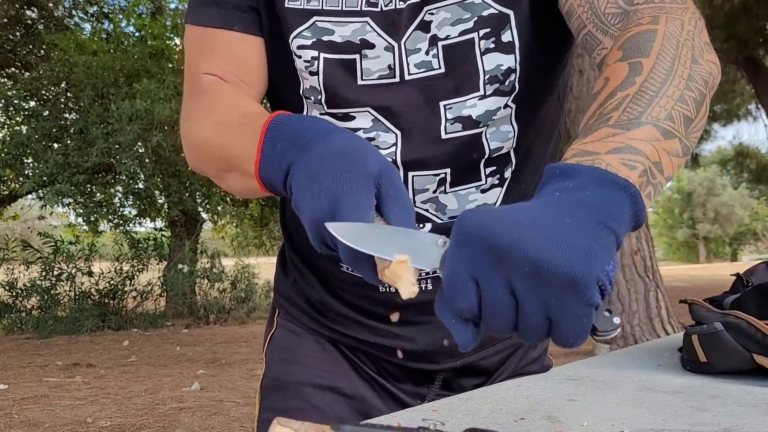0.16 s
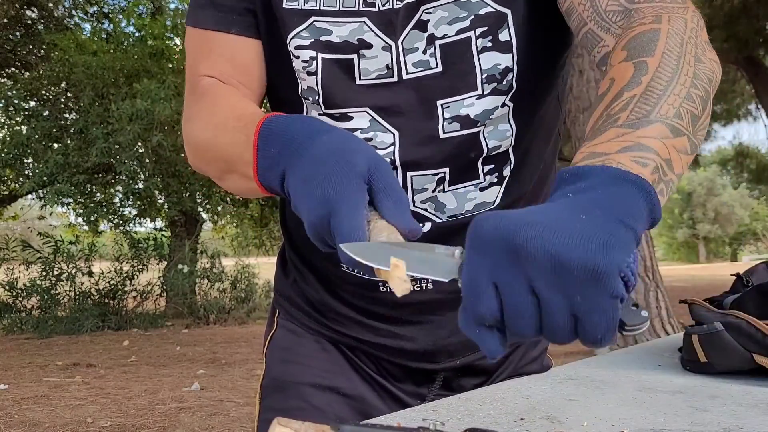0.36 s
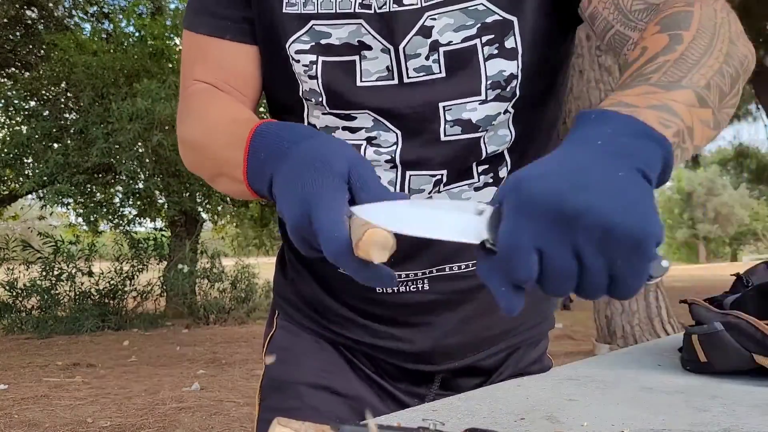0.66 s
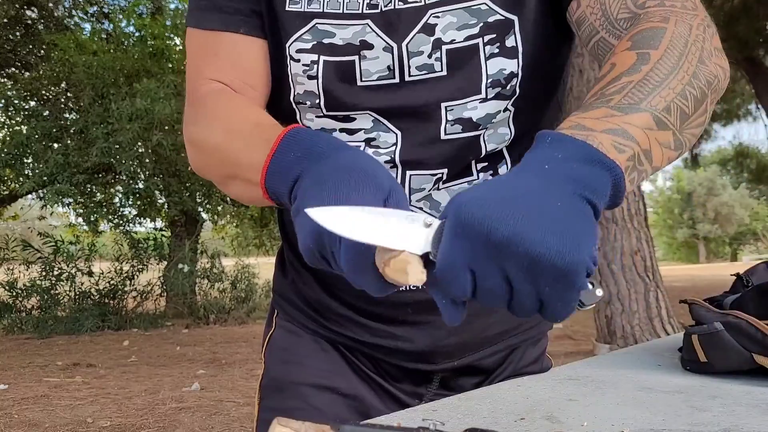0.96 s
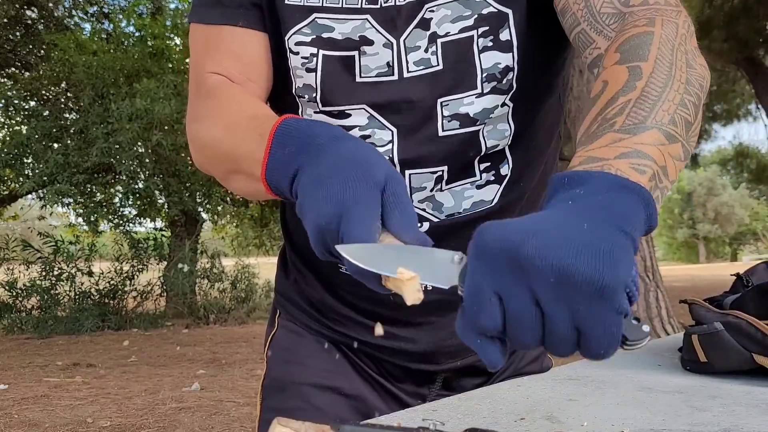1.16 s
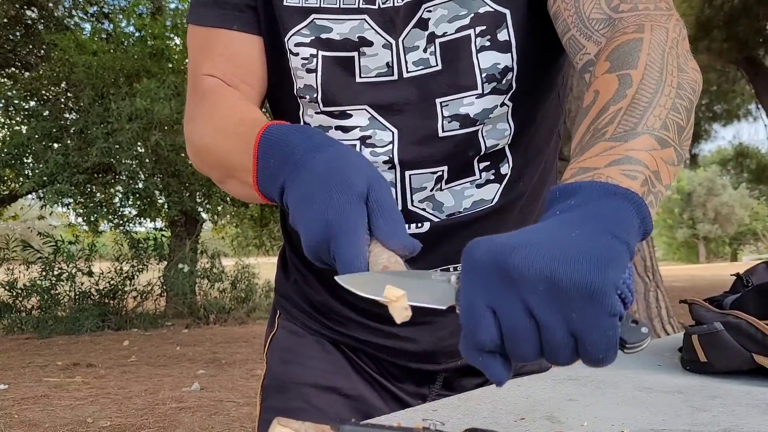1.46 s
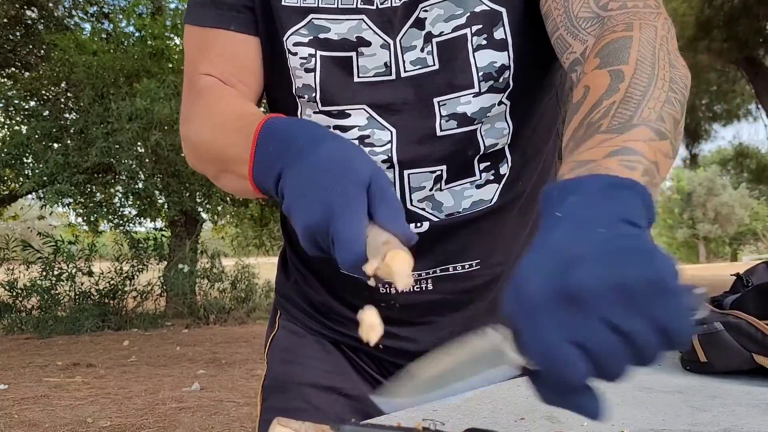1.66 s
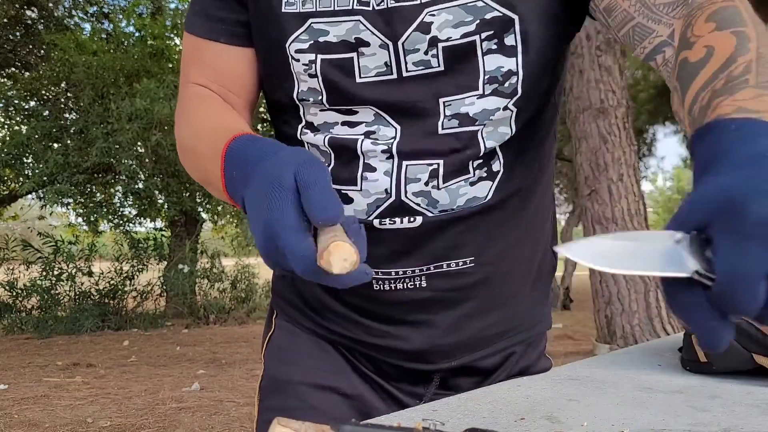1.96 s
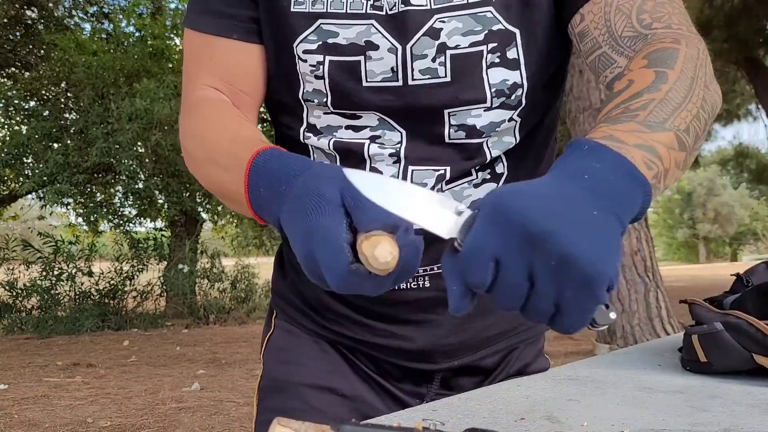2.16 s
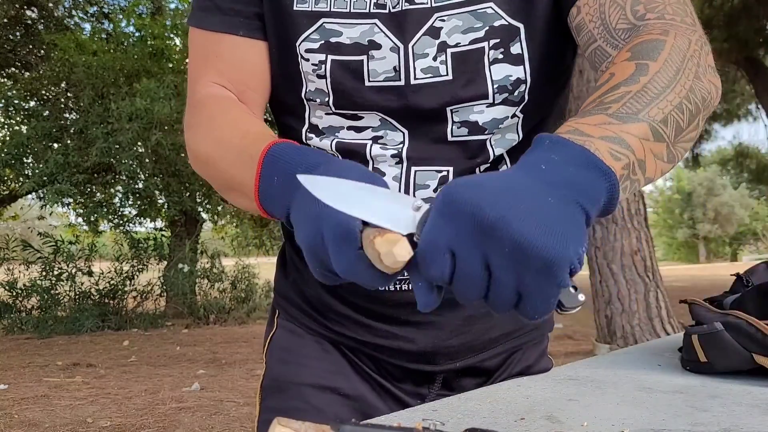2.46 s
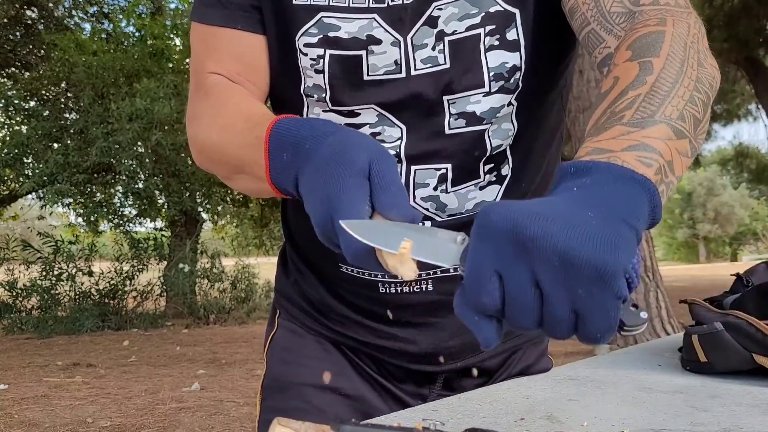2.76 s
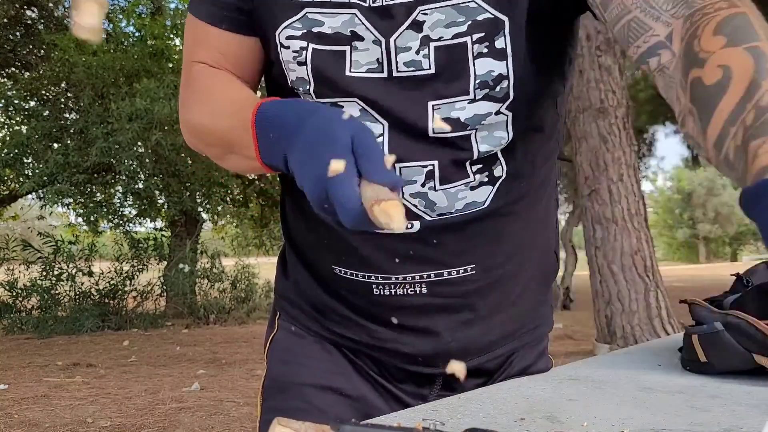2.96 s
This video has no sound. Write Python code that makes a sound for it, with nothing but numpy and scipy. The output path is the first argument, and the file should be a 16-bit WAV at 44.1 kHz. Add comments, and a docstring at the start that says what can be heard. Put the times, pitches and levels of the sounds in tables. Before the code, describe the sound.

Close outdoor whittling: quick crunchy cuts, a pause with a blade knock, more sharp strokes, quiet handling, then the brightest final snaps and a tick, over wavering low engine hum and fading breeze.

```python
"""An engine hums far off from the start, with a brief second hum: swelling sines over noise of the open air.
A knife whittles a hand-held stick close by: bursts of tiny impulses tear fibres and ring the damped stick.
Between strokes chips tick (noise snaps), gloves rustle (grainy friction), the blade knocks as it is set down
(decaying modes) and its edge slides (a thin hiss). More strokes follow while the breeze dies; a tick comes last."""
import sys
import numpy as np
from scipy import signal
from scipy.fft import rfft, irfft, next_fast_len
from scipy.io import wavfile
from scipy.ndimage import map_coordinates

SR = 44100
rng = np.random.default_rng(int(sys.argv[2]) if len(sys.argv) > 2 else 0)


def persist_wave(psi):
    """Save psi, clipped to +-1, as 16-bit WAV."""
    counts = np.round(np.clip(psi, -1, 1) * 32767).astype(np.int16)
    wavfile.write(sys.argv[1], SR, np.atleast_2d(counts).T)


N = 136710


def amp(db):
    """Decibels to amplitude ratio."""
    return 10 ** (np.asarray(db) / 20)


def unit(x):
    """Scale to rms 1."""
    return x / np.sqrt(np.mean(x ** 2) + 1e-20)


def along(points, hz):
    """Interpolate (hz, value) points on a log frequency axis."""
    point_hz, value = np.transpose(points)
    return np.interp(np.log(hz + 1), np.log(point_hz + 1), value)


def curve(points):
    """Interpolate (time_s, value) points to one value per sample."""
    return np.interp(np.arange(N) / SR, *np.transpose(points))


def filtered(x, response):
    """Multiply the spectrum by a response of frequency."""
    n = x.shape[-1]
    padded_n = next_fast_len(n + 4096)
    spectrum = rfft(x, padded_n) * response(np.fft.rfftfreq(padded_n, 1 / SR))
    return irfft(spectrum, padded_n)[..., :n]


def colour(points):
    """Response through (hz, db) points."""
    return lambda hz: amp(along(points, hz))


def resonances(modes, pitch_ratio):
    """Sum of band resonances of alternating sign, centres transposed by a pitch ratio."""
    def response(hz):
        total = 0
        for k, (centre_hz, width_hz, level_db) in enumerate(modes):
            damping = 1j * hz * width_hz
            stiffness = (centre_hz * pitch_ratio) ** 2
            total = total + (-1) ** k * amp(level_db) * damping / (stiffness - hz * hz + damping)
        return total
    return response


def pan(left_right_db):
    """Left and right gains of constant total power."""
    return unit(amp([[left_right_db / 2], [-left_right_db / 2]]))


def spread(pair, alike):
    """Mix two unrelated signals to a given left-right likeness."""
    turn = np.arccos(np.clip(alike, -1, 1)) / 2
    mid = np.cos(turn) * pair[0]
    side = np.sin(turn) * pair[1]
    return np.array([mid + side, mid - side])


def cracks(n, per_s, spread_db):
    """Two rows of tiny impulses at shared random moments, a few much larger than the rest."""
    size = amp(spread_db * np.minimum(rng.exponential(size=n), 3))
    happens = rng.random(n) < per_s / SR
    return rng.standard_normal((2, n)) * size * happens


def wobble(turns_per_s):
    """Smooth random curve through so many random points a second."""
    points = rng.standard_normal(int(N * turns_per_s / SR) + 4)
    return map_coordinates(points, [np.arange(N) * turns_per_s / SR])


def add(track, start_s, sound):
    """Mix a sound into the track."""
    i = max(round(start_s * SR), 0)
    track[:, i:i + sound.shape[1]] += sound[:, :N - i]


# engine fundamental: (time_s, pitch_hz)
ENGINE_PITCH = [(0, 121.9), (1.5, 120), (3.1, 119)]
# rms levels of fundamental and second harmonic: (time_s, level_db)
ENGINE_LEVEL = [(0, -38.5), (.35, -36), (.62, -28.5), (.85, -36), (1.05, -42), (1.25, -27), (1.5, -29.5),
                (1.9, -34.5), (2.5, -34), (2.7, -60), (2.83, -33), (3.1, -59)]
OCTAVE_LEVEL = [(0, -58.5), (.5, -47.5), (1.3, -49.5), (1.7, -48), (3.1, -49)]
FLUTTER_DB, FLUTTER_TURNS_PER_S = 1.3, 30
DRONE_HZ, DRONE_DB, DRONE_END_S, DRONE_FADE_S = 219.5, -47, 0.82, 0.11


def engine():
    """A far engine sinks in pitch as two harmonics swell and fade, the lower fluttering; a second hum fades."""
    t = np.arange(N) / SR
    phase = 2 * np.pi * np.cumsum(curve(ENGINE_PITCH)) / SR
    flutter_db = FLUTTER_DB * wobble(FLUTTER_TURNS_PER_S)
    hum = amp(curve(ENGINE_LEVEL) + flutter_db) * np.sin(phase)
    octave = amp(curve(OCTAVE_LEVEL)) * np.sin(2 * phase)
    drone_fade = np.clip((DRONE_END_S - t) / DRONE_FADE_S, 0, 1)
    drone = amp(DRONE_DB) * drone_fade * np.sin(2 * np.pi * DRONE_HZ * t)
    return np.sqrt(2) * (hum + octave + drone)  # rms to peak


# left-right likeness of the open air: (freq_hz, likeness_0_to_1)
AIR_ALIKE = [(30, 0.2), (60, 0.64), (130, 0.69), (500, 0.52), (1200, 0.06), (10000, 0.026)]


def wash(points):
    """Stereo noise of rms 1 with the given spectrum."""
    hz = np.fft.rfftfreq(N, 1 / SR)
    noise = spread(rfft(rng.standard_normal((2, N))), along(AIR_ALIKE, hz))
    return unit(irfft(noise * amp(along(points, hz)), N))


# spectra of low rumble, distant wash and hissing leaves: (freq_hz, relative_db)
RUMBLE_COLOUR = [(22, -31), (40, 1), (60, 10), (80, 6.5), (105, -2), (138, 6), (185, -9), (260, -10.5),
                 (380, -44), (1500, -110)]
AIR_COLOUR = [(150, -10.5), (300, 2), (500, -7), (1200, -4.5), (1700, -13.5), (2300, -16.5), (3000, -30.5),
              (6500, -39.5), (9000, -45)]
BREEZE_COLOUR = [(1200, -33), (2800, 7), (4200, 1), (6000, -8), (15000, -18)  ]
RUMBLE_DB, RUMBLE_SWELL_DB, RUMBLE_TURNS_PER_S = -33.5, 1, 17
AIR_DB, BREEZE_START_DB, BREEZE_FADE_DB_PER_S = -47.5, -63, 10.5


def air():
    """Uneven low rumble, a soft distant wash, and leaves hissing as a breeze dies away."""
    rumble_db = RUMBLE_DB + RUMBLE_SWELL_DB * wobble(RUMBLE_TURNS_PER_S)
    rumble = amp(rumble_db) * wash(RUMBLE_COLOUR)
    breeze_db = BREEZE_START_DB - BREEZE_FADE_DB_PER_S * np.arange(N) / SR
    breeze = amp(breeze_db) * wash(BREEZE_COLOUR)
    return pan(3.14) * (rumble + amp(AIR_DB) * wash(AIR_COLOUR) + breeze)


# fibres tearing; levels before the layer gains:
# (peak_s, width_s, thud_db, ring_db, splinter_db)
TEARS = [(0.074, 0.0018, -39.5, -43, -46), (0.099, 0.0093, -46.5, -39, -49.5),
         (0.116, 0.0098, -40.5, -39, -43), (0.197, 0.0068, -32.5, -26.5, -31),
         (0.201, 0.002, -29, -29, -24.5), (0.213, 0.0051, -47, -39, -39), (0.223, 0.0039, -38, -37.5, -34),
         (0.391, 0.0098, -39, -38.5, -35), (0.4, 0.0033, -36, -40, -24.5), (0.408, 0.012, -39.5, -37, -30),
         (1.054, 0.0041, -36, -37, -41), (1.073, 0.0033, -36, -22.5, -25.5),
         (1.111, 0.0065, -34, -31, -33.5), (1.134, 0.0094, -38.5, -40.5, -35),
         (1.239, 0.0054, -35.5, -34, -35), (1.657, 0.0054, -32.5, -36.5, -23),
         (1.664, 0.012, -61, -36, -36), (2.549, 0.02, -55, -48.5, -54), (2.635, 0.0038, -47, -34.5, -51),
         (2.662, 0.0086, -31.5, -23.5, -31.5), (2.671, 0.003, -50, -30.5, -32.5),
         (2.697, 0.004, -51, -48, -40), (2.706, 0.0035, -52, -46, -39), (2.8586, 0.0025, -32, -28, -19.5),
         (2.864, 0.0042, -28.5, -27, -31), (2.883, 0.0045, -36.5, -24, -17.5)]
# pitch shifts with grip and blade place; bite is relative to the splinter column:
# (from_s, thud_pitch_ratio, ring_pitch_ratio, bite_db)
GRIPS = [(0, 1.1, 1.01, -8), (.35, 1.04, .99, -10), (1, 1.04, 1.03, -11), (1.2, .96, .89, -16),
         (1.6, .86, 1.04, -10), (2.5, 1, .91, -12), (2.8, .93, .94, -14), (2.875, .97, 1.01, -7.5)]
# hand-damped stick, thud and ring, before the pitch ratios: (centre_hz, width_hz, relative_db)
THUD_MODES = [(429, 178, -3.5), (592, 143, 3), (766, 160, -5)]
RING_MODES = [(1192, 154, 4), (1822, 270, 0.5), (2400, 230, 0), (3100, 184, -1), (3780, 430, -6)]
# dry fibres snapping, before the pitch ratio: (centre_hz, width_hz, relative_db)
BITE_MODES = [(3020, 330, 4), (4890, 840, -1)]
# splinter treble: (freq_hz, relative_db)
SPLINTER_COLOUR = [(2500, 1), (4200, -4.5), (4800, -13), (5500, -11), (6500, 4), (8500, -1), (12000, 6),
                   (15500, 2)]
# where the cuts are heard: (freq_hz, left_right_db)
CUT_LEAN = [(500, -1.5), (1300, 4.5), (2400, 2.5), (3300, 3), (4700, -2), (6300, -4), (8200, 7.5),
            (11000, 5), (14000, 1)]
CRACKS_PER_S, CRACK_SPREAD_DB = 7500, 3.5
RISE, FALL = 0.43, 0.51  # shares of the width
SWELL_ROUNDNESS = 1.07  # 1 = pointed burst, 2 = bell
THUD_GAIN_DB, RING_GAIN_DB, SPLINTER_GAIN_DB = 1.5, -1, -3


def cuts():
    """Bursts of cracks swell and die within milliseconds: they thud, ring the stick, bite and spit treble."""
    out = np.zeros((2, N))
    t = np.arange(-SR // 32, SR // 16) / SR
    for peak_s, width_s, thud_db, ring_db, splinter_db in TEARS:
        _, thud_pitch, ring_pitch, bite_db = [row for row in GRIPS if row[0] <= peak_s][-1]
        side_share = np.where(t < 0, RISE, FALL)
        swell = np.exp(-np.abs(t / side_share / width_s) ** SWELL_ROUNDNESS)
        layers = [  # response, level_db, left-right likeness
            (resonances(THUD_MODES, thud_pitch), thud_db + THUD_GAIN_DB, .93),
            (resonances(RING_MODES, ring_pitch), ring_db + RING_GAIN_DB, .7),
            (resonances(BITE_MODES, 0.99), splinter_db + bite_db, 0),
            (colour(SPLINTER_COLOUR), splinter_db + SPLINTER_GAIN_DB, -.15)]
        width_gain = np.sqrt(width_s * SR / len(t))  # wider bursts carry more energy
        for response, level_db, alike in layers:
            grains = spread(cracks(len(t), CRACKS_PER_S, CRACK_SPREAD_DB), alike)
            burst = unit(filtered(grains * swell, response))
            add(out, peak_s + t[0], amp(level_db) * burst * width_gain)
    return filtered(out, lambda hz: amp(np.outer([.5, -.5], along(CUT_LEAN, hz))))


# echo among the trees: (freq_hz, t60_s)
TREE_DECAY = [(300, .9), (3000, 0.73), (8000, 0.49)]
TREES_DB, NEAR_DB, NEAR_T60_S = -23.5, -13.5, 0.017


def echoes(x):
    """Quick reflections off body and table, and a faint long tail from the trees, as decaying noise."""
    hz, t, cells = signal.stft(rng.standard_normal((2, SR)), SR, nperseg=256)
    decay = amp(-60 * t / along(TREE_DECAY, hz)[:, None])
    far = signal.istft(cells * decay, SR, nperseg=256)[1][:, :SR]
    t = np.arange(SR) / SR
    near = rng.standard_normal((2, SR)) * amp(-60 * t / NEAR_T60_S) * (t > .002)
    tail = amp(TREES_DB) * unit(far) + amp(NEAR_DB) * unit(near)
    return signal.fftconvolve(x, tail / np.sqrt(SR), axes=1)[:, :N]


# chips and small clicks, level before the common gain: (start_s, level_db, left_right_db)
CHIPS = [(.2960, -40, 4), (.5945, -28, 9.5), (.6964, -33, 3), (0.881, -45, 12), (1.7715, -35.5, 14),
         (1.8845, -42, 7), (1.937, -49.5, 22), (2.033, -53, 13), (2.284, -50, 10), (2.308, -56, -14),
         (2.322, -44, 5), (2.338, -45.5, 5), (3.0504, -40, 4)]
# snap spectrum: (freq_hz, relative_db)
CHIP_COLOUR = [(800, -2), (2400, -7), (4200, -4), (6000, -18), (12000, 0), (16000, -1.5)]
TICK_T60_S, TICK_GAIN_DB = 0.0031, 11.5


def ticks():
    """Single bright noise snaps with almost no ring."""
    out = np.zeros((2, N))
    t = np.arange(SR // 50) / SR
    for start_s, level_db, left_right_db in CHIPS:
        snap = unit(filtered(rng.standard_normal((2, len(t))), colour(CHIP_COLOUR)))
        decay = amp(level_db + TICK_GAIN_DB - 60 * t / TICK_T60_S)
        add(out, start_s, pan(left_right_db) * decay * snap)
    return out


# gloves rustling on the wood: (start_s, length_s, level_db)
RUSTLES = [(0.416, 0.011, -45), (0.616, 0.048, -58.5), (1.247, 0.02, -57), (1.901, 0.092, -64),
           (1.927, 0.011, -52), (2.026, 0.068, -61.5), (2.301, 0.054, -58.5)]
# friction spectrum: (freq_hz, relative_db)
RUSTLE_COLOUR = [(600, -19), (2500, -15), (5000, -11.5), (8000, -2), (12000, 0), (16000, -9)]
GRAINS_PER_S, GRAIN_SPREAD_DB, RUB_EDGE_S, RUB_LEAN_DB = 2500, 2.5, .014, 4
SNAG_TURNS_PER_S, SNAG_DB = 260, 6.5


def rubs():
    """Faint grainy friction that snags unevenly as the grip shifts."""
    t = np.arange(N) / SR
    level = np.zeros(N)
    for start_s, length_s, level_db in RUSTLES:
        edge_distance_s = np.minimum(t - start_s, start_s + length_s - t)
        level += amp(level_db) * np.clip(edge_distance_s / RUB_EDGE_S + .5, 0, 1)
    snags = amp(SNAG_DB * np.minimum(wobble(SNAG_TURNS_PER_S), 2))
    grains = filtered(cracks(N, GRAINS_PER_S, GRAIN_SPREAD_DB), colour(RUSTLE_COLOUR))
    return pan(RUB_LEAN_DB) * level * unit(snags * grains)


# blade set down on the stick, level before the common gain: (start_s, level_db, tilt_db_per_octave)
LANDINGS = [(0.717, -24, -0.5), (1.073, -24.5, 3.5), (2.2090, -29, -6.5)]
# hollow modes of the struck stick: (freq_hz, relative_db, t60_s)
LANDING_MODES = [(407, -10, 0.013), (746, -0.5, 0.0089), (1275, 0.5, 0.017), (1700, -10, 0.0061),
                 (2236, -4, 0.012), (3580, -12, 0.011)]
KNOCK_GAIN_DB, KNOCK_ATTACK_S, CLICK_DB, CLICK_T60_S = 9.5, 0.0015, -7, 0.0024


def knocks():
    """The blade lands on the stick: a small click and a short hollow ring, duller when the contact is soft."""
    out = np.zeros((2, N))
    t = np.arange(SR // 16) / SR
    attack = 1 - np.exp(-t / KNOCK_ATTACK_S)
    click_colour = colour([(3300, 1), (5500, -16.5), (15000, -20)])
    for start_s, level_db, tilt_db in LANDINGS:
        ring = np.zeros(len(t))
        for hz, mode_db, t60_s in LANDING_MODES:
            decay_db = mode_db + tilt_db * np.log2(hz / 1000) - 60 * t / t60_s
            ring += amp(decay_db) * np.sin(2 * np.pi * hz * t)
        click_noise = unit(filtered(rng.standard_normal((2, len(t))), click_colour))
        click = amp(CLICK_DB - 60 * t / CLICK_T60_S) * click_noise
        add(out, start_s, pan(5.5) * amp(level_db + KNOCK_GAIN_DB) * (ring * attack + click))
    return out


# edge sliding on wood: (freq_hz, relative_db)
EDGE_COLOUR = [(1200, -31), (2700, 6.5), (5500, -9), (10000, -7), (11600, 7), (13000, -9), (16000, -11)]
SLIDE_PEAK_S, SLIDE_WIDTH_S, SLIDE_DB = 0.796, 0.066, -57.5


def slide():
    """A thin hiss as the edge glides back along the wood before a cut."""
    swell = np.exp(-((np.arange(N) / SR - SLIDE_PEAK_S) / SLIDE_WIDTH_S) ** 2)
    hiss = unit(filtered(rng.standard_normal((2, N)), colour(EDGE_COLOUR)))
    return pan(5.5) * amp(SLIDE_DB) * swell * hiss


def scene():
    """The carving and its echoes in front of the outdoor background."""
    carving = cuts() + ticks() + rubs() + knocks() + slide()
    return engine() + air() + carving + echoes(carving)


TOP_HZ = 15900


def record(dry):
    """A steep low-pass: almost nothing sounds above TOP_HZ."""
    return filtered(dry, lambda hz: 1 / np.sqrt(1 + (hz / TOP_HZ) ** 160))


dry = scene()
out = record(dry)
persist_wave(out)
```